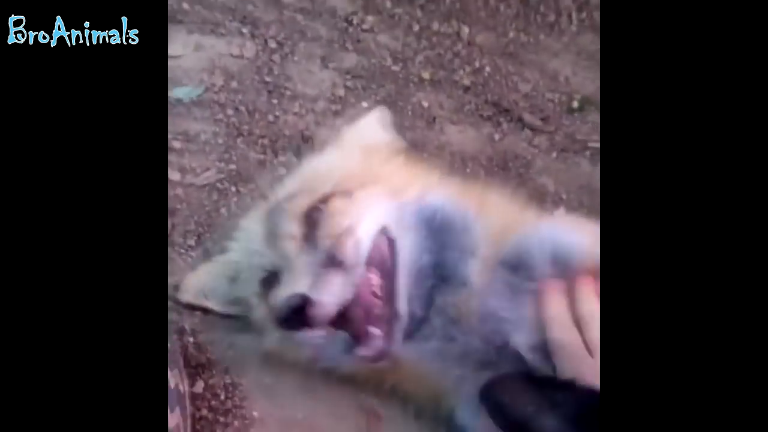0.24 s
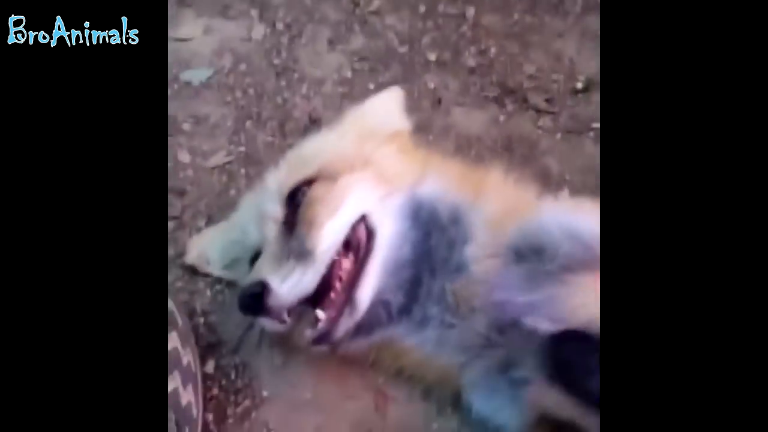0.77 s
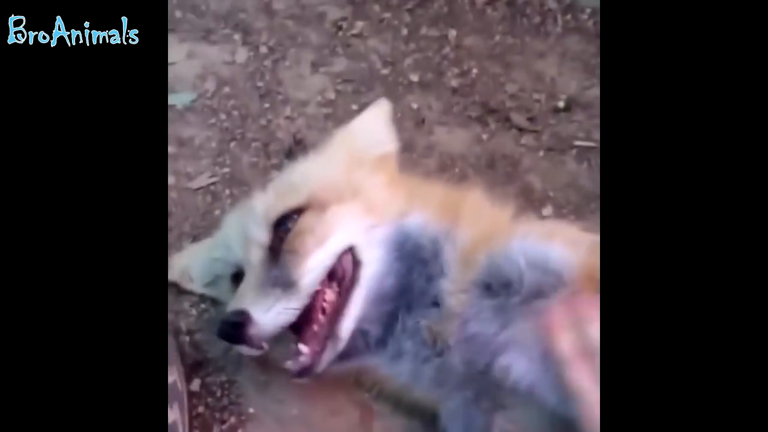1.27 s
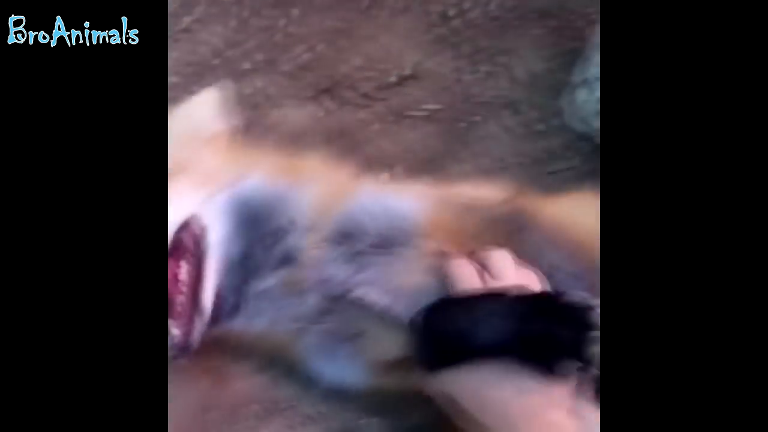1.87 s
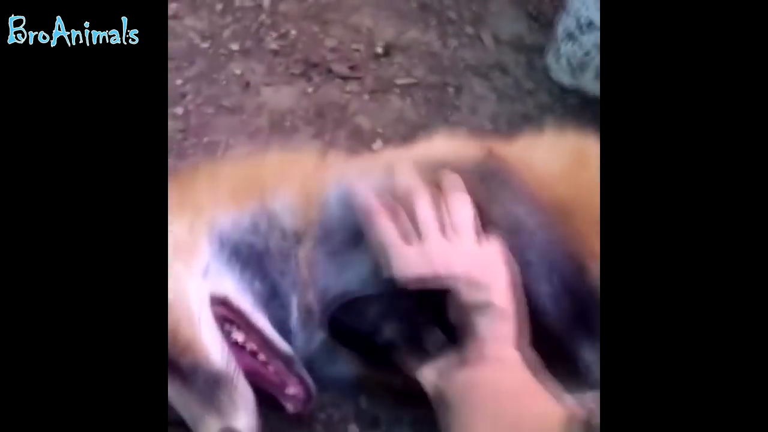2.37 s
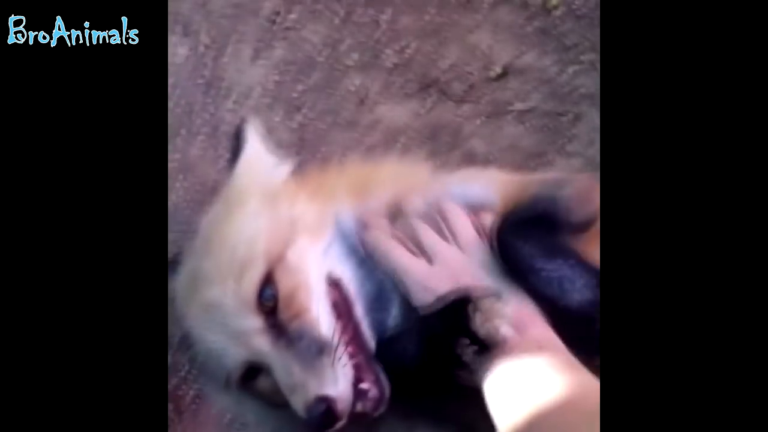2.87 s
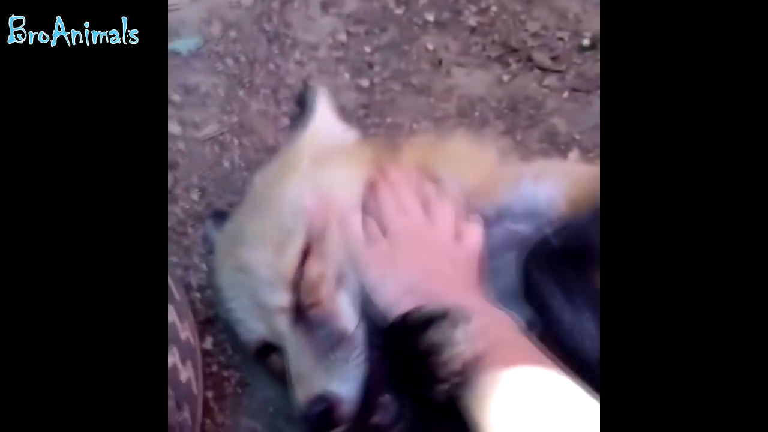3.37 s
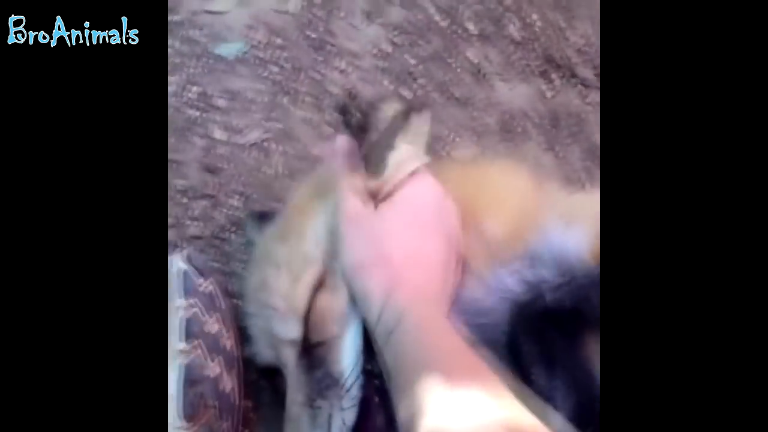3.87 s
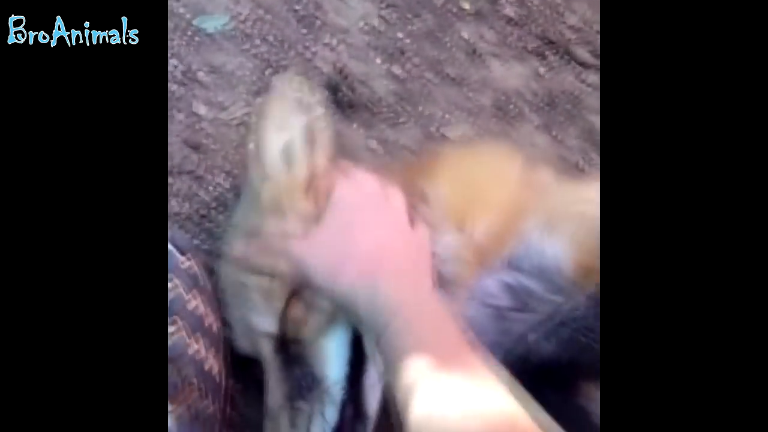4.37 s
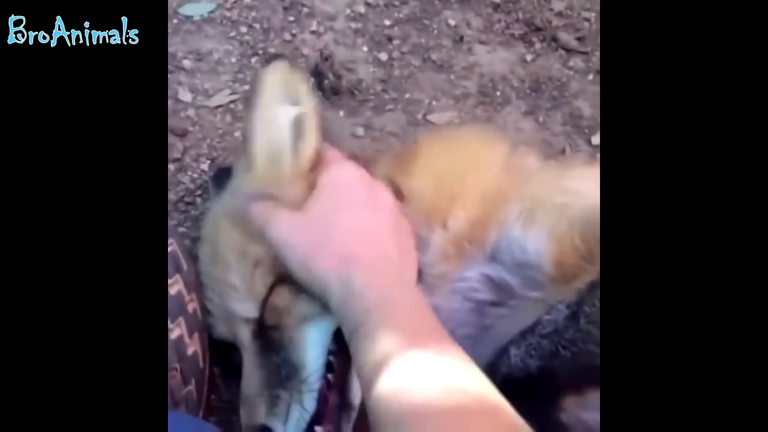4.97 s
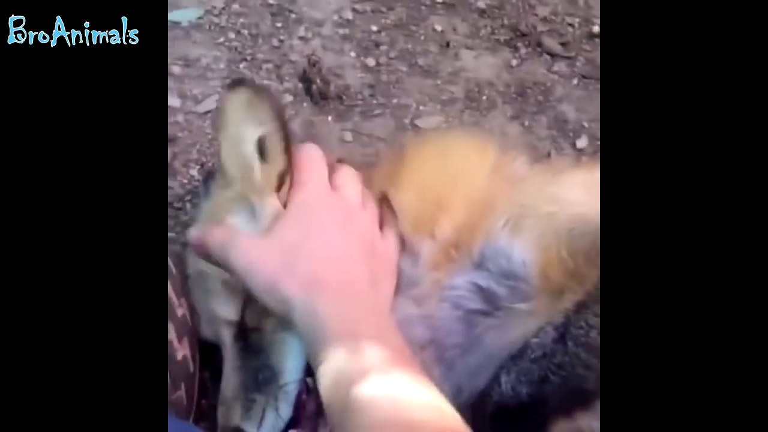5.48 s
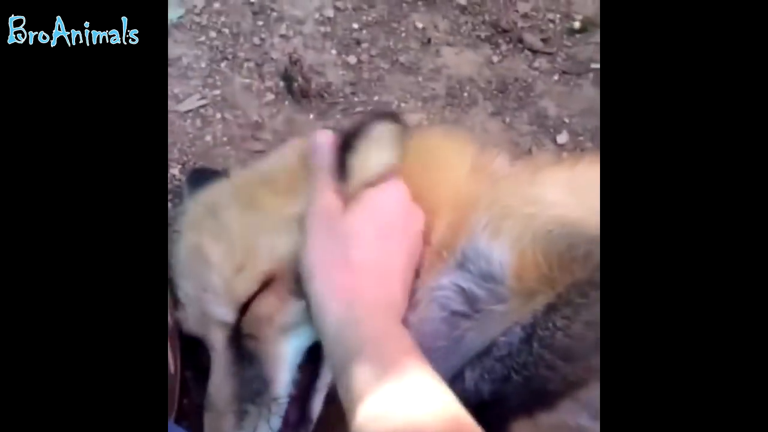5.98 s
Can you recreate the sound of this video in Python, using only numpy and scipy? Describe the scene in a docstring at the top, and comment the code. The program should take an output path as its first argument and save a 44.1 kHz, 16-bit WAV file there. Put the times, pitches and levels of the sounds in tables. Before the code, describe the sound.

A fox gives long, high, fluttering whines up close, then short low yips, while a hand softly rubs its fur.

```python
"""Four long, fluttering fox whines up close, then two short ones among low yips, as a hand rubs its fur.
Its vocal folds buzz through throat and jaw and throb about 25 times a second: each throb arches up
in pitch and level, then catches and turns rough. Air hisses through its teeth and puffs out as each
call ends. Bare ground reflects the voice; fur rustles and grit ticks over a faint outdoor rumble."""
import sys
import numpy as np
from scipy import signal
from scipy.fft import rfft, irfft, next_fast_len
from scipy.io import wavfile
from scipy.ndimage import uniform_filter1d, minimum_filter1d

SR = 44100
rng = np.random.default_rng(int(sys.argv[2]) if len(sys.argv) > 2 else 0)


def store_wav(level_fs):
    """Save 16-bit WAV to argv[1]."""
    pcm = np.round(np.clip(np.atleast_2d(level_fs), -1, 1) * 32767)
    wavfile.write(sys.argv[1], SR, pcm.T.astype(np.int16))


N = 275139
TIME = np.arange(N) / SR
TOP_HZ = 15600  # ceiling of the harmonics and of the mix
# drawn-out calls: start/s, end/s, flutter depth, closing puff/dB
WHINES = [(-.02, 0.728, 0.91, -43.5), (.899, 2.078, 1.04, -43), (2.258, 2.815, 0.94, -43),
          (2.973, 3.542, .95, -42.5), (3.696, 4.003, .85, -39.5), (5.277, 5.528, .55, -40.5)]
# short low calls: start/s, end/s, time the throbs are counted from/s, top pitch/Hz, level/dB,
# roughness, closing puff/dB
YIPS = [(4.172, 4.295, 4.215, 391.6, -17, .45, -37.5), (4.475, 4.596, 4.533, 341.7, -21, 0.8, -42),
        (4.787, 4.884, 4.2, 311.8, -27.5, 0.9, -42.5), (5.047, 5.143, 5.067, 318, -28.5, 0.9, -47),
        (5.696, 5.858, 6.3, 397, -14.5, 0.4, -38.5), (6.037, 6.061, 6.03, 321.2, -37, .3, -73),
        (6.089, 6.165, 5.9, 314.2, -25.5, 0.9, -45.5)]


def fox_voice(catch_rough=.4, edge_db=-2, scream_db=18, patchy_db=1.1):
    """Fluttering folds buzz through the throat and a jaw that takes four shapes in turn."""
    # throat and mouth resonances: f/Hz, level/dB
    wide_jaw = [(550, -10), (800, 6), (1100, 10.5), (1350, 3.5), (1750, -18.5), (2050, -12.5), (2450, -11),
                (3050, -7.5), (3800, -23), (4400, -10.5), (6400, -6.5), (8600, -14.5), (10000, -26),
                (13500, -29)]  # first whine
    scream_jaw = [(550, -1.5), (1000, 1), (1350, -3.5), (1650, -8), (2050, -0.5), (2350, -8.5), (2750, 0),
                  (3400, -6), (4300, -15.5), (4950, -11.5), (6200, -9), (8500, -13.5), (10500, -28.5),
                  (13500, -28.5)]  # shrill second whine
    narrow_jaw = [(550, -8), (800, 4.5), (1080, 5.5), (1600, -11), (2150, -14.5), (2480, -19.5),
                  (2900, -12.5), (3500, -23.5), (4300, -34.5), (5200, -20.5), (8300, -22), (9900, -34),
                  (11200, -33), (14000, -43)]  # third and fourth
    shut_jaw = [(500, 5.5), (700, 10), (880, 8.5), (1130, 6.5), (1340, -6.5), (1500, -14.5), (1900, -21),
                (2350, -15.5), (2650, -22), (3300, -16.5), (4300, -29.5), (6400, -12), (8400, -21),
                (10000, -34), (13500, -36)]  # short whines and yips
    jaw_changes_s = (.82, 2.18, 3.62)
    hz, hoarse, bands_db, voiced, throbs, catch_db, warble = add_yips(*whine_gestures())
    bend, loudness, arch = flutter(throbs, hoarse, catch_db, warble)
    fundamental, buzz = vocal_folds(hz * bend, hoarse, catch_rough * (1 - arch) ** 2)
    buzz = ground_echoes(buzz)
    vowels = [colour(buzz, jaw) for jaw in (wide_jaw, scream_jaw, narrow_jaw, shut_jaw)]
    throat = np.choose(np.searchsorted(jaw_changes_s, TIME), vowels)
    mouth = steady(band(throat, 560, 1460))
    upper = steady(band(throat, 1460, 4200))
    hiss = steady(band(throat, 4200, 15000))
    low_gain, mouth_gain, upper_gain, hiss_gain = gains = undb(bands_db)
    # in shrill stretches each crest flares brighter; elsewhere the tone barely changes
    shrill = upper_gain ** 2 / np.sum(gains ** 2, axis=0)
    edge = undb((edge_db + scream_db * shrill ** 2) * (arch - .914))
    voice = undb(.5 + patchy_db * wander(50)) * low_gain * fundamental
    voice += undb(2) * mouth_gain * mouth
    voice += undb(1 + patchy_db * wander(70)) * upper_gain * edge * upper
    voice += undb(.5 + patchy_db * wander(110)) * hiss_gain * np.sqrt(edge) * hiss
    return band(voice * loudness * voiced, 160, 15000)


def whine_gestures(attack_s=.018, release_s=.027, catch_db=-3):
    """Control curves for the whines: the folds tighten and slacken, the mouth opens and shuts."""
    # tension of the folds: t/s, crest pitch/Hz, roughness
    tension = [(0, 599, 0.19), (.12, 599.6, 0.08), (.23, 636, 0.02), (.45, 636, 0.18), (.56, 608, 0.14),
               (.64, 594, 0), (.73, 545, 0.01), (.925, 400, .25), (.99, 534.5, .33), (1.04, 496.2, .3),
               (1.11, 566.7, .25), (1.2, 565, .15), (1.31, 586, .15), (1.52, 701.3, 0.09),
               (1.7, 650.7, 0.06), (1.92, 648.7, 0.14), (2.08, 568, 0.08), (2.26, 538, 0.47),
               (2.31, 565.2, 0.4), (2.39, 559, 0.17), (2.69, 567.4, 0.04), (2.81, 454.4, 0.46),
               (2.97, 483.3, 0.69), (3.08, 507.6, 0.31), (3.15, 552.6, .18), (3.33, 570.3, 0.11),
               (3.46, 503.5, .2), (3.55, 330.4, 0.36), (3.7, 411, 0.56), (3.76, 455.4, .35),
               (3.85, 433.7, .2), (3.9, 466.4, .2), (3.95, 404.7, 0.23), (4.01, 295.9, 0.17),
               (5.28, 299.9, 1.06), (5.37, 345, .95), (5.435, 489.2, 0.6), (5.475, 444, .15),
               (5.53, 273.5, 0.27)]
    # mouth opening: t/s, fundamental/dB, mouth resonance/dB, upper resonances/dB, teeth hiss/dB
    vowel = [(0.0, -33, -22, -15.5, -22), (0.065, -29.0, -20, -27, -24.5), (0.205, -26.5, -20.5, -16, -22),
             (0.309, -27.0, -29, -23.0, -26.5), (0.404, -33, -13.5, -29.5, -28.5),
             (0.464, -28, -23.5, -18, -24.5), (0.569, -35.5, -20, -33, -31.5),
             (0.673, -34.5, -18, -23, -29), (0.708, -50, -22, -31, -30.5), (0.92, -22.5, -34, -39, -40.5),
             (0.965, -30.5, -17.5, -21.5, -25.5), (1.204, -32, -16, -29, -25),
             (1.254, -27, -21, -19, -21.5), (1.314, -30.5, -12.5, -27, -26.5),
             (1.389, -24.5, -20.5, -13.5, -22), (1.449, -27, -13.5, -27, -27.0),
             (1.514, -24, -26, -5.5, -15), (1.579, -27.5, -17, -19, -20), (1.628, -26.5, -22.5, -9, -18),
             (1.733, -29.5, -16, -31, -30), (1.808, -28, -19, -24, -22.5),
             (1.918, -33.5, -30.0, -27.5, -32.5), (2.057, -26.5, -21, -27.5, -40.5),
             (2.275, -25, -29.5, -19, -39), (2.31, -28, -24.5, -15.5, -37), (2.365, -30, -23.5, -26, -33),
             (2.574, -30.5, -19.5, -25, -34.5), (2.629, -29.5, -21.5, -28.0, -39),
             (2.694, -30, -19.0, -23.5, -33), (2.789, -32, -27.5, -31.5, -36.5),
             (2.985, -29, -26, -18.5, -38), (3.105, -30.5, -20.5, -27.5, -33),
             (3.17, -29, -18.5, -22.5, -30), (3.244, -32.5, -21.5, -28, -37.5),
             (3.309, -27, -19.5, -21.5, -37), (3.479, -36.5, -21, -35, -36.0),
             (3.519, -29, -31.5, -38.5, -43), (3.715, -26, -44.5, -52.5, -49.0),
             (3.76, -32, -25.5, -36, -38), (3.815, -21.5, -26.5, -40, -40), (3.905, -31, -26.5, -36.0, -39),
             (3.949, -19, -27.5, -49, -39), (3.984, -16, -32, -44.0, -40), (5.3, -28, -44.5, -46, -50.5),
             (5.38, -25, -33, -45, -46), (5.44, -28.5, -23.5, -31.5, -39.0),
             (5.465, -36, -19, -33.5, -32.5), (5.5, -23, -33, -42, -35)]
    # throb pace of each whine: first catch/s, start rate/Hz, middle rate/Hz, end rate/Hz
    pace = [(-.002, 25.6, 25, 22.4), (.934, 24.4, 28.05, 21.3), (2.277, 22.1, 23.45, 20.6),
            (2.985, 26.6, 23.55, 22.9), (3.708, 28.7, 20.3, 34.5), (5.299, 13, 31.5, 21)]
    hz, hoarse = curves(tension)
    voiced, throbs, depth = np.zeros((3, N))
    for (start, end, flutter_depth, _), (catch, *rates) in zip(WHINES, pace):
        now = (TIME >= start) & (TIME < end)
        t = TIME[now]
        throb_hz = np.interp(t, np.linspace(start, end, len(rates)), rates)
        turns = np.cumsum(throb_hz) / SR
        throbs[now] = turns - np.interp(catch, t, turns)  # whole numbers fall on catches
        depth[now] = flutter_depth
        voiced[now] = (ramp(t - start, attack_s) * ramp(end - t, release_s)) ** 1.3
    return hz, hoarse, np.array(curves(vowel)), voiced, throbs, catch_db * depth, depth


def add_yips(hz, hoarse, bands_db, voiced, throbs, catch_db, warble):
    """Write the yips into the curves: each arches in pitch, swells and dies, mouth widest at its peak."""
    flutter_hz, fade_s = 21.82, .004
    scoop, sag = .091, .58  # shares of the top pitch
    peak, open_width = .58, .39  # shares of the length
    onset_db, tail_db, shut_db = -7.5, -23.5, -10.5
    open_db = np.array([-13, -23.5, -21.5])  # mouth, upper resonances, hiss against the fundamental
    for start, end, count_from, top_hz, db, rough, _ in YIPS:
        now = (TIME >= start) & (TIME < end)
        t = TIME[now]
        place = (t - start) / (end - start)
        hz[now] = top_hz * (1 - np.where(place < .5, scoop, sag) * (2 * place - 1) ** 2)
        early, late = ramp(peak - place, peak), ramp(place - peak, 1 - peak)
        bands_db[:, now] = db + onset_db * early ** 2 + tail_db * late ** 2
        shut = 1 - np.exp(-((place - peak) / open_width) ** 2)
        bands_db[1:, now] += open_db[:, None] + shut_db * shut
        voiced[now] = ramp(t - start, fade_s) * ramp(end - t, fade_s)
        throbs[now] = (t - count_from) * flutter_hz
        hoarse[now], catch_db[now], warble[now] = rough, -6.5, .65
    return hz, hoarse, bands_db, voiced, throbs, catch_db, warble


def flutter(throbs, hoarse, catch_db, warble, lean_db=4, waver=.0076, scatter=.28, uneven_db=1.08):
    """Pitch and level arch between catches of the folds; the arch is 0 at a catch, 1 on the crest."""
    along = throbs % 1 - .5
    catch = np.abs(np.sin(np.pi * along)) ** 5.6
    arch = 1 - catch
    dip = catch * (1 + scatter * wander(25))  # no two throbs are equally deep
    pitch_drop = .085 + .24 * np.minimum(hoarse, .5)  # hoarse folds dip further
    bend = 1 - warble * dip * pitch_drop + waver * wander(45)
    # pressure builds through a throb until the catch cuts it off with a quick flick down
    db = catch_db * dip + lean_db * along * arch + uneven_db * wander(25)
    flick_db = -5 * np.exp(-(((throbs + .54) % 1 - .5) / .08) ** 2)
    return bend, undb(db + flick_db), arch


def vocal_folds(hz, hoarse, catch_rough, jitter=.03, treble_air_db=-9, growl_db=-6):
    """Uneven cycles give a growling fundamental and a buzz of overtones, with air pulsing once a cycle."""
    rough = hoarse + catch_rough
    phase = 2 * np.pi * np.cumsum(hz * (1 + jitter * rough * wander(400))) / SR
    # each closure comes a little early or late: low harmonics stay pure, high ones rasp
    phase += .028 * wander(450)
    # hoarse cycles differ in size and alternate strong and weak
    uneven = 1 + hoarse ** 2 * (.42 * wander(350) + .25 * np.cos(phase / 2))
    air = unit(noise() * (1 + .5 * np.cos(phase)))
    turbulence = rough * band(air, 1340, 17000) + undb(treble_air_db) * band(air, 3000, 17000)
    # slack, hoarse folds leak air that blurs the first harmonics, and flap in a low growl
    turbulence += hoarse ** 3 * band(air, 500, 1350)
    growl = undb(growl_db) * hoarse ** 3 * unit(band(noise(), 150, 360))
    return unit(np.cos(phase)) * uneven + growl, overtones(phase, hz) * uneven + turbulence


def overtones(phase, hz, ring_db=7.5, patchy_db=4.5, lag=.45, upper_width_hz=400, teeth_width_hz=550):
    """Harmonics of the folds; those that cross a moving resonance ring out."""
    # tongue and lips steer two resonances: t/s, upper/Hz, teeth/Hz
    tongue = [(0, 3050, 5850), (.24, 3260, 4600), (.43, 2800, 6000), (.7, 2490, 5850), (1.12, 2286, 6700),
              (1.42, 2810, 6500), (1.52, 2470, 4840), (1.63, 2376, 5905), (1.73, 3050, 6400),
              (1.92, 2103, 6400), (2.3, 2150, 5300), (2.38, 1589, 5700), (2.66, 2408, 6400),
              (3.02, 1610, 5900), (3.45, 1650, 5750), (4.25, 3270, 6750), (5.45, 1861, 5950),
              (5.75, 2877, 6330)]
    upper_hz, teeth_hz = curves(tongue)
    total = 0
    for k in range(2, 30):
        ring = np.exp(-((k * hz - upper_hz) / upper_width_hz) ** 2)
        ring += np.exp(-((k * hz - teeth_hz) / teeth_width_hz) ** 2)
        # each also swells on its own as the head moves; higher ones lag, which rounds the pulse
        strength = undb(ring_db * ring + patchy_db * wander(20)) * ramp(TOP_HZ - k * hz, hz)
        total += strength * np.cos(k * phase - lag * k ** 2)
    return unit(total)


def ground_echoes(x, sway_s=.00023):
    """Bounces off the earth and nearby surfaces comb the sound; the notches drift as the head rolls."""
    echoes = ((.0007, -8), (.0021, -14), (.0047, -17), (.0083, -18), (.0125, -23))  # delay/s, level/dB
    return x + sum(undb(db) * np.interp(TIME - s - sway_s * wander(3.3), TIME, x, left=0)
                   for s, db in echoes)


def breath_puffs(lead_s=.018, half_width_s=.026):
    """Soft bursts of unvoiced air leave the muzzle, peaking just before each call ends."""
    # breath colour: f/Hz, level/dB
    breath = [(300, 14.5), (900, 7.5), (2300, -5.5), (3500, 5), (4400, -8), (6300, 2), (8500, -5),
              (11000, -11.5), (14000, -19)]
    swell = sum(undb(db) * np.exp(-((TIME - end + lead_s) / half_width_s) ** 2)
                for _, end, *_, db in WHINES + YIPS)
    return swell * unit(band(colour(noise(), breath), 250, 14000))


def grit_ticks(decay_s=.0084):
    """Grit and lips make small dry clicks that die away at once."""
    # clicks: t/s, level/dB
    ticks = [(2.244, -35.5), (2.952, -34.5), (3.589, -45.5), (3.696, -31.5), (4.444, -58.5), (4.475, -42),
             (4.643, -43.5), (4.763, -37.5), (4.795, -38), (5.005, -46), (5.682, -44.5), (5.911, -49.5),
             (6.082, -39)]
    strikes = sum(undb(db) * (TIME >= s) * np.exp(-np.abs(TIME - s) / decay_s) for s, db in ticks)
    grit = unit(colour(noise(), [(200, 29), (1000, 3.5), (3000, -15), (6500, -1.5), (13000, -18)]))
    return band(strikes * grit, 140, 14000)


def fur_rubbing(grain_db=3, half_width_s=.0092):
    """Hairs slip under the fingers as dense tiny grains, in uneven strokes."""
    # the hand's steady rub and its firmer strokes: t/s, level/dB
    rub = [(0, -57.5), (2, -54.5), (3.5, -56.5), (4.1, -59), (4.4, -56), (4.65, -55.5), (4.95, -58),
           (5.2, -55), (5.65, -60.5), (5.95, -58), (6.24, -65)]
    strokes = [(4.349, -60), (4.645, -52), (5.0, -53.5), (5.945, -65)]
    # rustle colour: f/Hz, level/dB
    fur = [(100, -8), (200, 7), (500, 4.5), (1200, -1.5), (3000, -1.5), (7000, -13), (13000, -26)]
    grains = noise() * undb(grain_db * wander(820))
    rustle = unit(band(colour(grains, fur), 60, 13500))
    gentle = undb(curves(rub)[0] + 4 * np.tanh(wander(14)))
    firm = sum(undb(db) * np.exp(-((TIME - s) / half_width_s) ** 2) for s, db in strokes)
    return rustle * (gentle + firm)


def yard_scatter(x, wet_db=-26, t60_s=.22):
    """The surroundings scatter back a weak, short tail."""
    tail = band(noise() * undb(-60 * TIME / t60_s), 250, 7000)
    tail /= np.sqrt(np.sum(tail ** 2))
    return x + undb(wet_db) * signal.fftconvolve(x, tail)[:N]


def outdoor_rumble(start_db=-59.5, waver_db=4, rise_db=9):
    """A faint low bed that wavers and slowly grows."""
    # rumble colour: f/Hz, level/dB
    rumble = [(25, -54), (60, -18.5), (110, 1), (170, 5.5), (260, 7), (420, -5.5), (700, -4.5),
              (1200, -25.5), (2000, -22), (3000, -25.5), (4200, -39), (6500, -22), (13000, -27.5),
              (15000, -57.5)]
    bed = unit(colour(noise(), rumble))
    return bed * undb(start_db + waver_db * wander(8.2) + rise_db * TIME / TIME[-1])


def undb(db):
    """Decibels to gain."""
    return 10 ** (np.asarray(db) / 20)


def unit(x):
    """Scale to rms 1."""
    return x / np.sqrt(np.mean(x ** 2))


def steady(x, size=1500):
    """Hold the rms at 1 while harmonics slide in and out of a resonance."""
    return x / np.sqrt(uniform_filter1d(uniform_filter1d(x ** 2, size), size) + 1e-12)


def ramp(x, length):
    """Rise from 0 at zero to 1 at length."""
    return np.clip(x / length, 0, 1)


def curves(rows):
    """A per-sample curve for each column after the time."""
    s, *columns = np.transpose(rows)
    return [np.interp(TIME, s, column) for column in columns]


def noise():
    """White noise."""
    return rng.standard_normal(N)


def wander(rate_hz):
    """Random drift of rms 1 that changes about rate_hz times a second."""
    return unit(np.interp(TIME * rate_hz, np.arange(N), noise()))


def band(x, lo_hz, hi_hz):
    """Steep band-pass without delay."""
    return signal.sosfiltfilt(signal.butter(4, [lo_hz, hi_hz], "band", fs=SR, output="sos"), x)


def colour(x, points):
    """EQ through points of f/Hz, level/dB."""
    hz, db = np.transpose(points)
    size = next_fast_len(N + 4096)
    bin_hz = np.maximum(np.arange(size // 2 + 1) * SR / size, 1)
    gain = undb(np.interp(np.log(bin_hz), np.log(hz), db))
    return irfft(rfft(x, size) * gain, size)[:N]


def scene():
    """The fox, the hand and the yard, in mono."""
    fox = yard_scatter(fox_voice() + breath_puffs() + grit_ticks())
    return (fox + fur_rubbing() + outdoor_rumble())[None]


def record(dry, ceiling=.95):
    """A phone's limiter reins in the loudest throbs; a steep low-pass cuts the top."""
    allowed = ceiling / np.maximum(np.abs(dry), ceiling)
    gain = uniform_filter1d(minimum_filter1d(allowed, size=300), size=300)
    return signal.sosfilt(signal.ellip(8, .2, 70, TOP_HZ, fs=SR, output="sos"), dry * gain)


dry = scene()
out = record(dry)
store_wav(out)
```